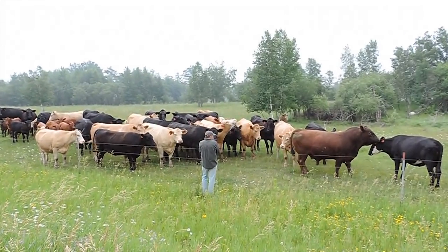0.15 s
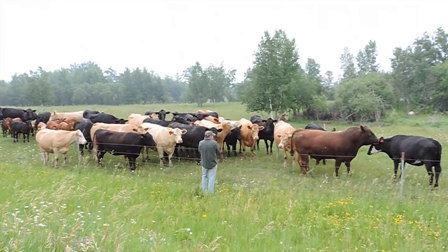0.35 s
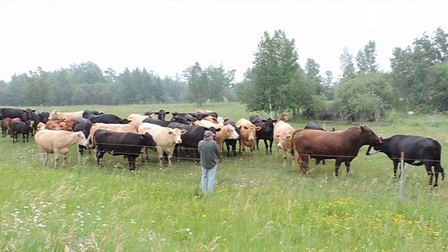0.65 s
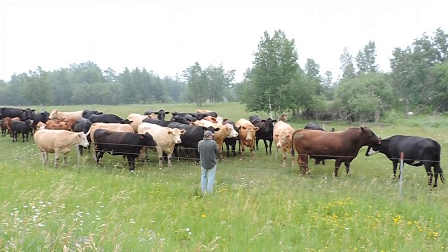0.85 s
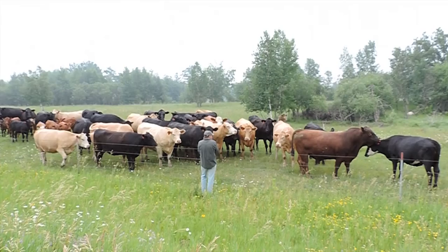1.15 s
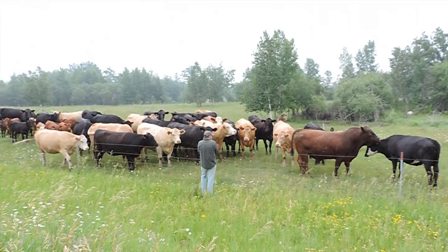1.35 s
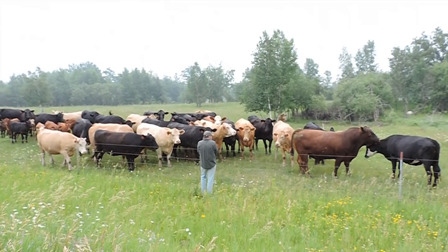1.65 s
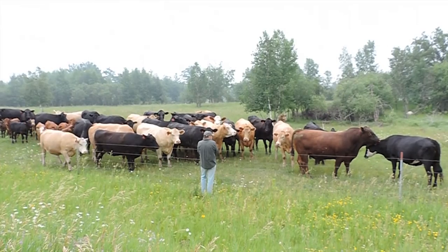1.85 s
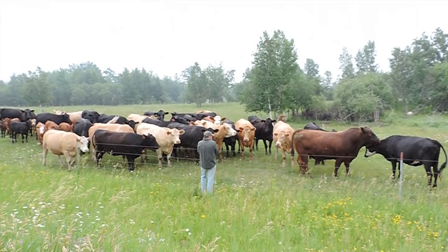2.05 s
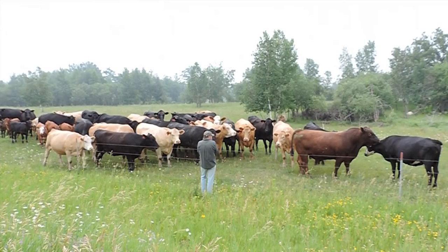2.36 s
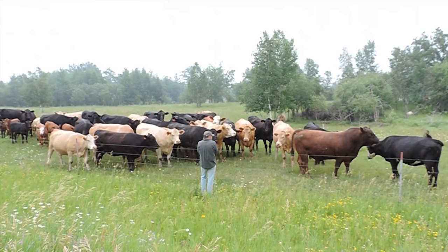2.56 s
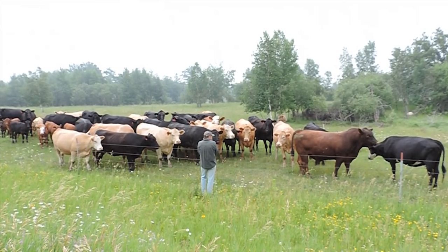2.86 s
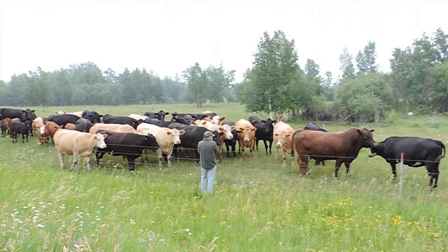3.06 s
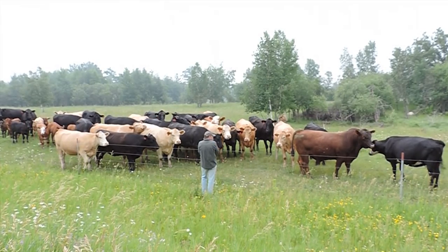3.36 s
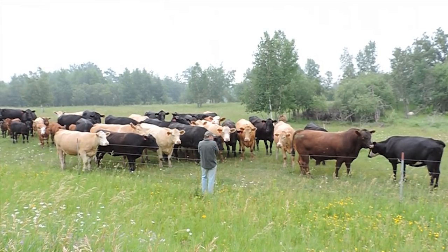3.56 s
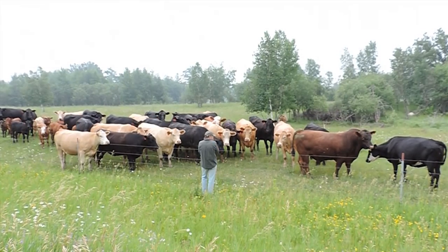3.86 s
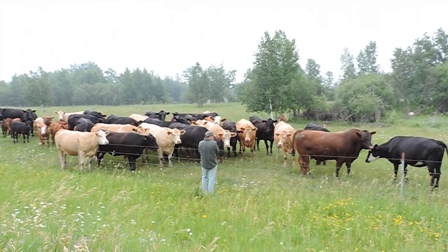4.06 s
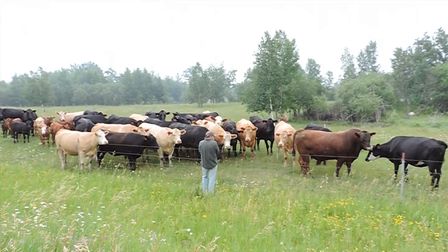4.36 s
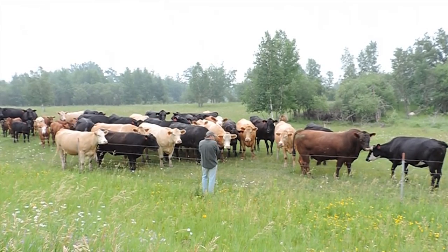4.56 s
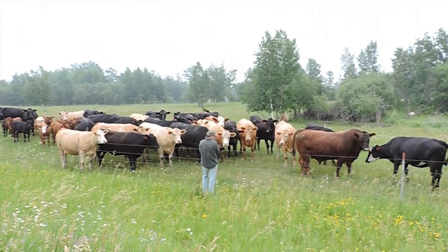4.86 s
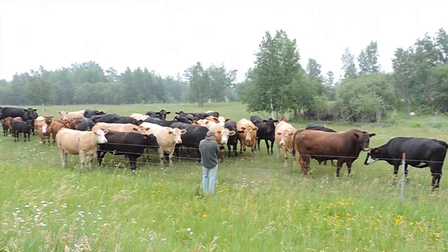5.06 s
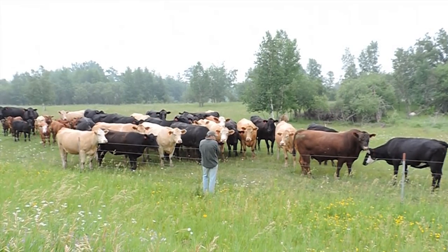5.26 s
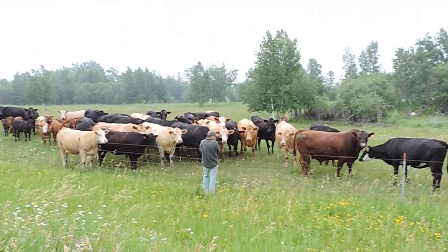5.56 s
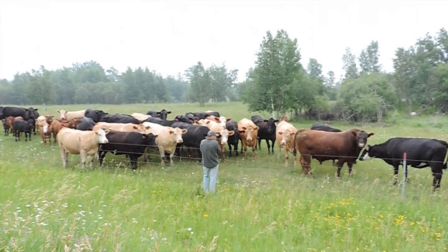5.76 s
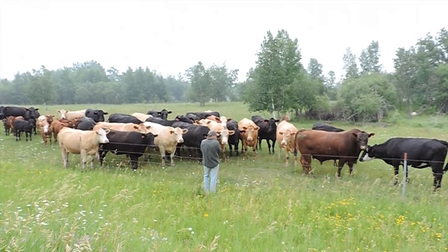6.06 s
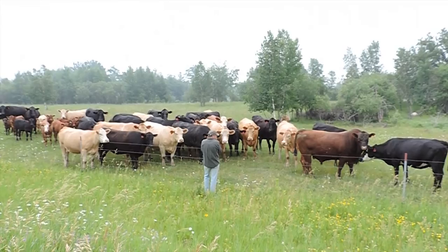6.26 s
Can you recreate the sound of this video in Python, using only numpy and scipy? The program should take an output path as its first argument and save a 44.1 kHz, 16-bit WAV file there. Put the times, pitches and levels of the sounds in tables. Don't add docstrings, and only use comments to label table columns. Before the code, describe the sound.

Faint closed-mouth cow hum over soft wind and birdsong, then one long moo climbing into an open, brassy bellow and ending abruptly.

```python
import sys
import numpy as np
from scipy import signal
from scipy.fft import rfft, irfft
from scipy.io import wavfile
from scipy.ndimage import uniform_filter1d

SR = 44100
rng = np.random.default_rng(int(sys.argv[2]) if len(sys.argv) > 2 else 0)


def boost(x):
    u = np.asarray(x, float) / 20
    return 10 ** u


def transcribe(u):
    v = np.clip(np.atleast_2d(u).T, -1, 1)
    q = np.round(v * 32767).astype(np.int16)
    wavfile.write(sys.argv[1], SR, q)


N = 282681


def evened(x):
    return x / np.sqrt(np.mean(x ** 2) + 1e-20)


def read(points, hz):
    f, value = np.transpose(points)
    return np.interp(np.log(hz + 1), np.log(f + 1), value)


def along(rows):
    s, *columns = np.transpose(rows)
    t = np.arange(s[0], s[-1], 1 / SR)
    return [t] + [np.interp(t, s, c) for c in columns]


def add(mix, s, sound):
    part = mix[round(s * SR):][:len(sound)]
    part += sound[:len(part)]


def drift(shape, per_s):
    size = int(SR / per_s)
    noise = rng.standard_normal(shape)
    return evened(uniform_filter1d(uniform_filter1d(noise, size), size))


def bump(t, middle_s, length_s):
    return np.cos(np.pi * np.clip((t - middle_s) / length_s, -.5, .5))


# f/Hz, level/dB [per Hz]
AIR_SPECTRUM = [(25, -7), (40, 0.5), (60, -22.5), (85, -7.5), (150, -7), (400, -12.5), (900, -14.5),
                (1500, -16.5), (2800, -20), (4000, -24), (5800, -25), (6500, -30), (10000, -33),
                (12000, -35.5)]
# f/Hz, likeness [0-1]
AIR_LIKENESS = [(40, 0.95), (110, 0.84), (200, 0.65), (600, 0.61), (1200, 0.45), (2500, 0.39), (4000, 0.1),
                (6500, 0.58), (11000, 0.5)]


def air(level_db=-57):
    frames, hz = N // 256 + 5, np.fft.rfftfreq(1024, 1 / SR)
    a, b, c, d, patches = rng.standard_normal((frames, 513, 5)).T
    patches = evened(uniform_filter1d(uniform_filter1d(patches, 12, 0), 10, 1))
    swell_db = .45 * drift(frames * 256, 6)[::256]
    same = np.clip(read(AIR_LIKENESS, hz), -1, 1)[:, None]
    left = a + 1j * b
    right = same * left + np.sqrt(1 - same ** 2) * (c + 1j * d)
    z = np.array([left, right]) * boost(read(AIR_SPECTRUM, hz)[:, None] + 0.89 * patches + swell_db)
    return boost(level_db) * evened(signal.istft(z, nperseg=1024, noverlap=768)[1][:, :N])


def hump(hz, width_hz):
    z = rfft(rng.standard_normal(N))
    off = (np.fft.rfftfreq(N, 1 / SR) - hz) / width_hz
    return evened(irfft(z / (1 + off ** 2), N))


# f/Hz, width/Hz, level/dB
DRONES = [
    (61.3, 6.3, -68),
    (986, 14, -75),
]


def drones():
    return sum(boost(db) * hump(hz, width_hz) for hz, width_hz, db in DRONES)


# f/Hz, level/dB
LEAVES = [(100, -7), (300, -9), (800, -4), (1150, 3.5), (1500, 8.5), (3000, 10), (8000, 2)]
# f/Hz, t60/s
TREE_DECAY = [(100, 1.1), (1000, 3.16), (4000, 1.1)]


def trees(x):
    taps = np.zeros((2, SR))
    slots = np.arange(2000, SR - 40, 40)
    at = slots + rng.integers(0, 40, (2, len(slots)))
    np.put_along_axis(taps, at, rng.choice([-1., 1.], at.shape), 1)
    taps[1] = 1.5 * taps[0] + 0.25 * taps[1]
    hz, t, z = signal.stft(taps / np.sqrt(at.shape[1]), SR, nperseg=256)
    decay_db = read(LEAVES, hz)[:, None] - 60 * t / read(TREE_DECAY, hz)[:, None]
    tail = signal.istft(z * boost(decay_db), SR, nperseg=256)[1]
    return signal.fftconvolve(x[None], tail, axes=1)[:, :N]


def note(s, length, start_hz, end_hz, peak_db, noisy):
    n = int(length * SR)
    tone = np.sin(2 * np.pi * np.cumsum(np.linspace(start_hz, end_hz, n)) / SR)
    smear = 1 - noisy + noisy * drift(n, 600)
    return s, boost(peak_db) * tone * np.sqrt(np.hanning(n)) * smear


def add_notes(mix, rows, noisy):
    for row in rows:
        add(mix, *note(*row, noisy))


def phrase(shape, s, length, start_hz, end_hz, peak_db):
    return [(s + u * length, start_hz + u * (end_hz - start_hz), peak_db + db) for u, db in shape]


def whistle(rows, pulses_per_s=0, warble_hz=25):
    t, hz, level_db = along(rows)
    tone = np.sin(2 * np.pi * np.cumsum(hz + warble_hz * drift(len(t), 173)) / SR)
    chop = evened(1 + 0.7 * np.cos(2 * np.pi * pulses_per_s * t))
    level = np.sqrt(2) * boost(level_db + 1.1 * drift(len(t), 120))
    return t[0], level * tone * chop * signal.windows.tukey(len(t), .15)


# t/s, length/s, start f/Hz, end f/Hz, peak level/dB
DRIPS = [(.31, .006, 900, 900, -44), (2.323, .045, 250, 350, -55), (2.513, .045, 290, 450, -49),
         (2.905, .05, 1520, 1500, -59), (6.192, .025, 590, 550, -48), (6.21, .04, 550, 510, -44)]
HUSKS = [(1.262, .025, 190, 130, -48), (1.267, .033, 4000, 4000, -61), (1.267, .03, 4500, 4500, -62),
         (2.012, .022, 9800, 10200, -62), (2.125, .03, 9600, 9300, -66), (5.925, .035, 3500, 3900, -59)]
RUSTLES = [(.312, .018, 1300, 1000, -50), (.312, .015, 1800, 1600, -54), (2.03, .12, 5100, 4700, -65),
           (2.04, .11, 4700, 5200, -66)]


def small_noises(ahead):
    add_notes(ahead, DRIPS, noisy=.1)
    add_notes(ahead, HUSKS, noisy=.38)
    add_notes(ahead, RUSTLES, noisy=.85)


# t/s, length/s, start f/Hz, end f/Hz, peak level/dB
WHISTLES = [(1.07, .13, 7000, 7130, -64.5), (1.43, .16, 6900, 7040, -66.5), (1.815, .115, 6830, 6925, -65)]
WHISTLE_SHAPE = [(0, -16), (.12, -2), (.3, -1.5), (.85, -3), (1, -14)]


def thin_whistles(right):
    for row in WHISTLES:
        add(right, *whistle(phrase(WHISTLE_SHAPE, *row)))


# t/s, length/s, start f/Hz, end f/Hz, level/dB
TRILLS = [
    (3.25, .405, 2700, 2675, -64),
    (3.225, .35, 5170, 5110, -70),
    (.31, .13, 2760, 2480, -63),
]
TRILL_SHAPE = [(0, 8), (.1, -2), (.85, -3), (1, -5)]


def trills(right):
    pulses_per_s, warble_hz = [46, 35, 90], [15, 11, 80]
    for row, pulses, warble in zip(TRILLS, pulses_per_s, warble_hz):
        add(right, *whistle(phrase(TRILL_SHAPE, *row), pulses, warble))


# t/s, length/s, start f/Hz, end f/Hz, peak level/dB
LOW_BIRD_NOTES = [(.17, .075, 3150, 2750, -61), (2.972, .065, 2550, 2350, -54),
                  (3.163, .025, 2600, 2450, -58), (6.16, .045, 2600, 2350, -63),
                  (6.24, .08, 3250, 2250, -59.5), (6.31, .055, 2300, 3500, -59.5),
                  (6.355, .05, 3500, 3150, -60)]


def low_bird(right):
    add_notes(right, LOW_BIRD_NOTES, noisy=.45)


# t/s, length/s, start f/Hz, end f/Hz, peak level/dB
RISES = [(1.91, .13, 6850, 9250, -51), (2.03, .13, 7800, 9390, -55.5)]
RISE_SHAPE = [(0, -6), (.3, -6.5), (.62, -1.5), (1, -26)]


def rising_whistles(ahead):
    for row in RISES:
        add(ahead, *whistle(phrase(RISE_SHAPE, *row), warble_hz=85))


def chips(ahead, right):
    first_s, gap_s, answer_s = 2.27, .1212, .056
    chip_db, answer_db, weaker_db = -61, -62, -4.5
    for j in range(7):
        s = first_s + j * gap_s
        add(ahead, *note(s, .034, 5850, 4500, chip_db, .05))
        add(right, *note(s + answer_s, .024, 2900, 2450, answer_db + weaker_db * (j % 2), .15))


HUM_PARTIALS_DB = [-1, -16.5, -19.5, -24.5, -26]
# middle t/s, length/s, peak level/dB
SWELLS = [(1.28, .1, -58), (1.49, .36, -59), (1.86, .3, -55.5), (2.16, .32, -59.5)]


def hum():
    start_s, length_s, base_hz, arch_hz, rest_db = 1.25, 1.2, 58.8, 3.8, -68
    t = np.arange(start_s, start_s + length_s, 1 / SR)
    turns = np.cumsum(base_hz + arch_hz * np.sin(np.pi * (t - start_s) / length_s)) / SR
    level = boost(rest_db) + sum(boost(db) * bump(t, s, length) for s, length, db in SWELLS)
    tone = 0
    for k, db in enumerate(HUM_PARTIALS_DB, 1):
        tone = tone + boost(db + 1.5 * drift(len(t), 17)) * np.cos(2 * np.pi * k * turns)
    return t[0], np.sqrt(2) * level * tone * signal.windows.tukey(len(t), .05)


def folds(t, hz, gains):
    k = np.arange(1, len(gains) + 1)[:, None]
    turns = np.cumsum(hz * (1 + 0.0031 * drift(len(t), 130))) / SR
    lag = .12 * k ** 2 + 1.76 * (k > 3.5) + 0.089 * np.maximum(k - 6, 0) * drift(gains.shape, 25)
    lowpass = signal.butter(2, 400, fs=SR, output="sos")
    breath = evened(signal.sosfilt(lowpass, rng.standard_normal(len(t))))
    voice = (gains * np.cos(2 * np.pi * k * turns - lag)).sum(0)
    return np.sqrt(2) * voice * (1 + boost(-33.0) * breath)


# t/s, f/Hz, level/dB
NASAL = [(4.04, 59.8, -73), (4.14, 70.4, -53.5), (4.25, 78.7, -49), (4.44, 95.8, -46.5),
         (4.6, 121.5, -44.5), (4.785, 156.5, -42)]
# f/Hz, level/dB
NOSE = [(60, -6), (84, 5), (100, 0), (190, 1.5), (240, -5), (265, -13.5), (292, -22.5), (340, -22)]
# f/Hz, level/dB
LEAK = [(300, -12), (420, -1.5), (520, -12.5), (660, 1.5), (800, -10.5), (1000, -19), (1250, -8),
        (1500, -18.5), (2000, -31.5)]


def nose_gains(k):
    t, hz, effort_db = along(NASAL)
    leak_db = effort_db - 17 + 5 * (t - t.mean())
    gains = boost(leak_db + read(LEAK, k * hz) + 3.5 * drift((len(k), len(t)), 22))
    gains[:3] = boost(effort_db + read(NOSE, k[:3] * hz))
    return t, hz, gains


# f/Hz, width/Hz, level/dB
TRACT = [(598.6, 233.4, 2.1), (573.5, 56.9, 1.7), (732.6, 25.1, 6.6), (735.8, 42.5, 7.4),
         (786.4, 32.3, 8.9), (829.6, 126.7, 3.1), (894.5, 35.4, -8.5), (1003.0, 25.2, -11.2),
         (1089.2, 25.0, -8.4), (1200.8, 52.3, -14.3), (1362.3, 29.0, -18.6), (1441.1, 100.6, -22.9)]


def tract(hz):
    rings = [boost(db) / (1 + 2j * (hz - f) / width) for f, width, db in TRACT]
    return abs(sum((-1) ** j * ring for j, ring in enumerate(rings)))


# t/s, f/Hz, level/dB
BELLOW = [(4.775, 157, -39), (4.86, 167.5, -33.5), (4.93, 173, -37), (5.02, 177.6, -31.5),
          (5.2, 186, -27.5), (5.36, 194, -24), (5.55, 195.2, -23), (5.84, 191.3, -24.3)]
SPENT = [(5.93, 182, -28), (5.98, 172, -31), (6.0, 163, -33), (6.02, 142, -37), (6.05, 118, -44)]
# t/s, fold buzz level/dB, opening [stretch of all resonances]
JAW = [(4.775, -62.1, 0.885), (4.789, -50.3, 0.883), (4.835, -46.3, 0.964), (4.896, -35.9, 0.972),
       (5.078, -36.6, 1.001), (5.296, -29.4, 1.045), (5.669, -33.3, 1.018), (5.822, -37.6, 1.092),
       (6.05, -46.6, 1.043)]
# f/Hz, level/dB
THROAT = [(220, -6), (270, -2), (320, -27), (340, -17.5), (355, -20), (368, -17.5), (378, -19),
          (390, -19.5)]
# f/Hz, level/dB
BRASS = [(1050, -5), (1250, -1), (1370, -15), (1500, -0.5), (1720, -9.5), (1950, -2.5), (2150, -16.5),
         (2350, -5), (2600, -14), (2850, -20), (3100, -14), (3350, -25.5), (4000, -30)]


def mouth_gains(k):
    t, hz, effort_db = along(BELLOW + SPENT)
    buzz_db, opening = along(JAW)[1:]
    flutter = drift((len(k), len(t)), 16)
    rasp = 1 + .3 * drift((len(k), len(t)), 160)
    dull_db = .12 * np.maximum(hz - hz.mean(), 0)
    gains = rasp * boost(.6 * buzz_db - 39 - dull_db + read(BRASS, k * hz) + 4 * flutter)
    middle = k[2:8]
    waver_db = .5 * middle / 5 * flutter[2:8]
    gains[2:8] = boost(buzz_db + waver_db) * tract(middle * hz / opening)
    gains[3:8:4] += boost([[-43], [-54]]) * bump(t, 4.798, .034)
    gains[0] = boost(effort_db)
    gains[1] = boost(effort_db + read(THROAT, 2 * hz) - 6 * (t - t.mean()))
    return t, hz, gains


def moo():
    k = np.arange(1, 25)[:, None]
    shut, shut_hz, nose = nose_gains(k)
    t, hz, mouth = mouth_gains(k)
    keep = shut < t[0]
    t = np.r_[shut[keep], t]
    hz = uniform_filter1d(np.r_[shut_hz[keep], hz], size=1200)
    gains = uniform_filter1d(np.hstack([nose[:, keep], mouth]), size=250)
    return t[0], folds(t, hz, gains) * signal.windows.tukey(len(t), .015)


# t/s, length/s, start f/Hz, end f/Hz, peak level/dB
GULPS = [(6.02, 0.045, 232, 215, -27), (6.052, 0.032, 179, 197, -38), (6.04, 0.049, 115, 85, -47.5)]


def gulps(cows):
    add_notes(cows, GULPS, noisy=.1)


def scene():
    cows, ahead, right = np.zeros((3, N))
    small_noises(ahead)
    thin_whistles(right)
    trills(right)
    low_bird(right)
    rising_whistles(ahead)
    chips(ahead, right)
    add(cows, *hum())
    add(cows, *moo())
    gulps(cows)
    lag = np.array([[.3], [-.3]])
    pan = boost([[-3.], [2.5]])
    direct = cows + np.gradient(cows) * lag + ahead + right * pan + drones()
    return direct + boost(-7) * trees(cows) + boost(-13.0) * trees(ahead + right) + air()


def thinned(x):
    hz, t, z = signal.stft(x, SR, nperseg=1024)
    power = (abs(z) ** 2).mean(0)
    near_db = 10 * np.log10(uniform_filter1d(np.roll(power, 8, 0), 40, 0) + 1e-20)
    patch = np.repeat(rng.standard_normal((len(hz) // 4 + 1, len(t))), 4, 0)[:len(hz)]
    bar_db = near_db - 6 + 6.5 * evened(uniform_filter1d(patch, 4))
    weak = (10 * np.log10(power + 1e-20) < bar_db) & (hz > 2800)[:, None]
    return signal.istft(z * np.where(weak, boost(-18), 1), SR, nperseg=1024)[1][:, :N]


def roll_off(x):
    return signal.sosfilt(signal.butter(12, 11970, fs=SR, output="sos"), x)


def record(dry):
    mix = thinned(dry)
    return roll_off(mix)


dry = scene()
out = record(dry)
transcribe(out)
```